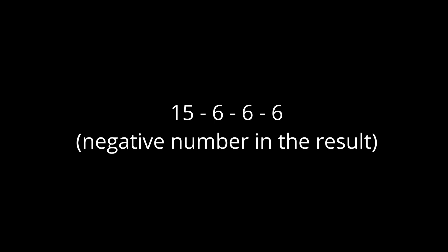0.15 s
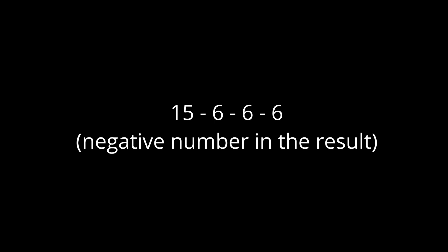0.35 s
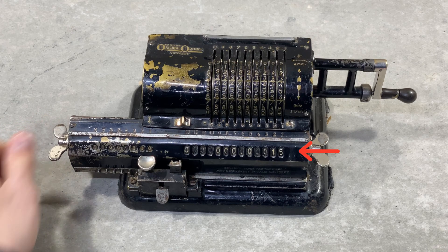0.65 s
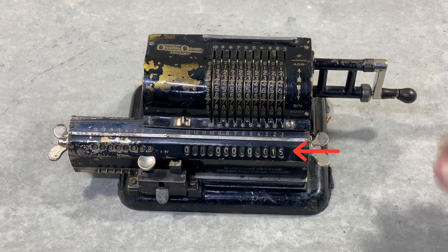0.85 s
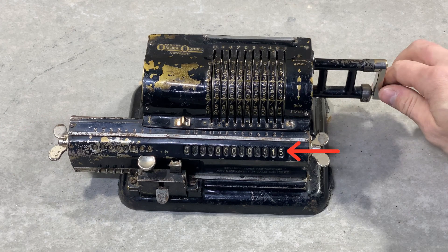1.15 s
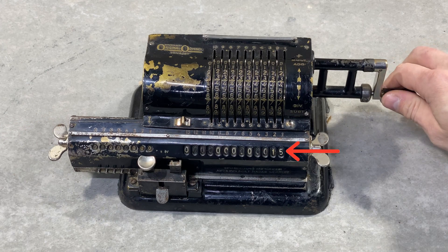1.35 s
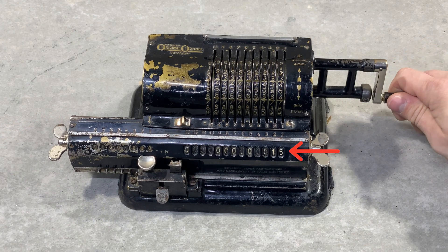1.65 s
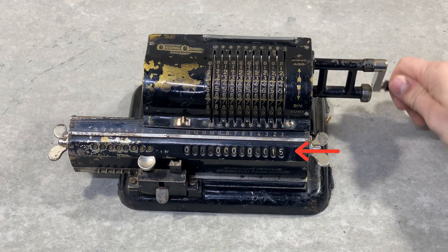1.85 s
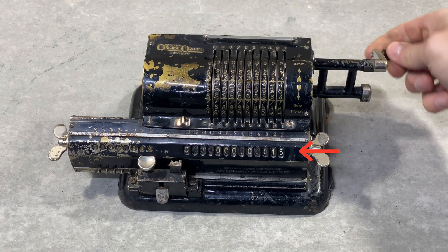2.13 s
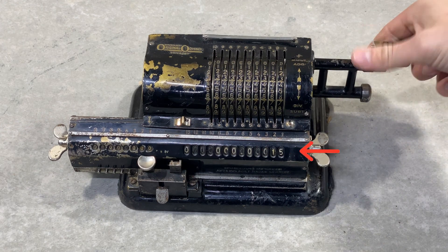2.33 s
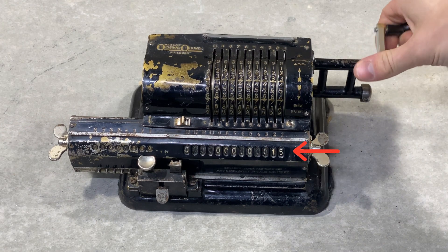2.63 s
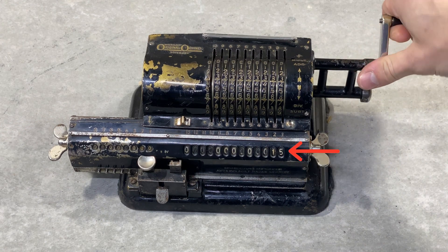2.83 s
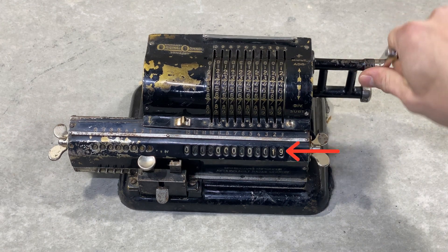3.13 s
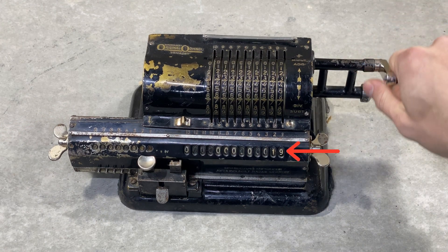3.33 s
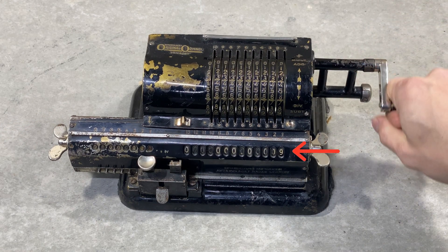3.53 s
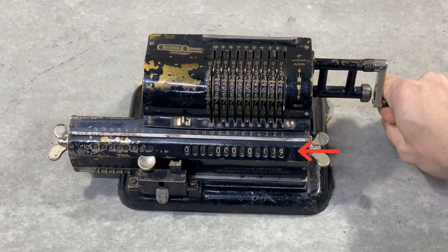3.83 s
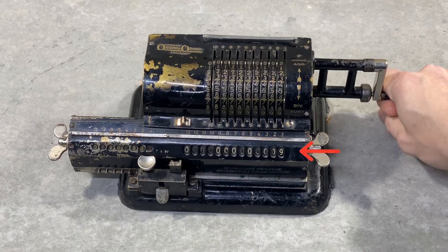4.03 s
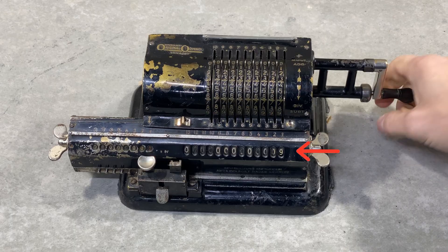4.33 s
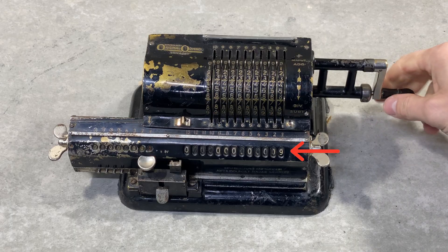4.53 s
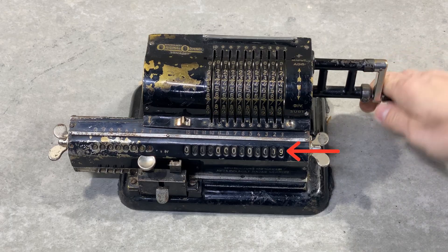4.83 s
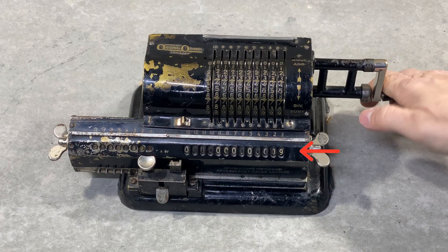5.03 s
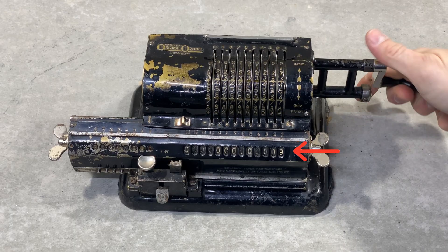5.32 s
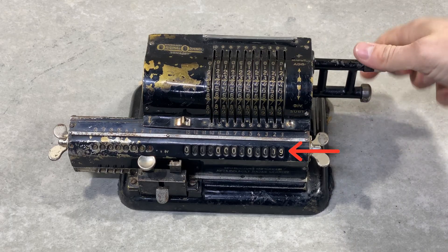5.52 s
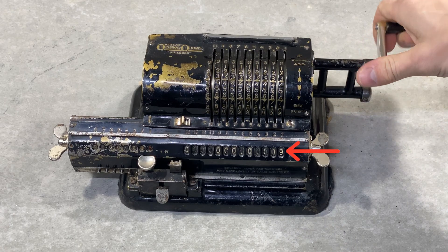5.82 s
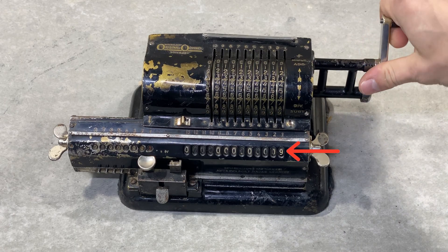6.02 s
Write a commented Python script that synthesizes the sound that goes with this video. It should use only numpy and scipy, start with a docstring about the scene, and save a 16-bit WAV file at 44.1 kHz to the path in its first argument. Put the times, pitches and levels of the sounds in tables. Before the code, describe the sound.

A hand-cranked mechanical calculator makes sparse faint ticks, then a loud burst of ratchet clicks and a frame thud, soft clicks, and two sharp closing snaps.

```python
"""Pawls and detents click inside a hand-cranked pinwheel calculator, close by and stronger on the left.
The clicks are short bursts of noise ringing in steel; the cast frame thuds as a sum of fading tones.
Coloured noise makes the rocking and shaking frame, the rumbling slab, the rubbing bearings and
a fine hiss that rises and falls. A bare room answers with fading noise tails, over a faint steady hush."""
import sys
import numpy as np
from scipy import signal
from scipy.fft import rfft, irfft, next_fast_len
from scipy.io import wavfile
from scipy.ndimage import map_coordinates

SR = 44100
rng = np.random.default_rng(int(sys.argv[2]) if len(sys.argv) > 2 else 0)


def generate_wav(sig):
    """Save sig (samples, or channels by samples) to the path in sys.argv[1] as 16-bit PCM at SR."""
    pcm = np.round(np.clip(np.atleast_2d(sig).T, -1, 1) * 32767).astype(np.int16)
    wavfile.write(sys.argv[1], SR, pcm)


N = 272097

# Tones of the cast frame. Each row: pitch in Hz, relative level in dB,
# time to fade by 60 dB in seconds when the damping is 1.
FRAME_MODES = [(74.4, -21, 0.34), (117.6, 1.5, .25), (166.5, -10.5, 0.51), (196, -15, 0.37),
               (274, -4, 0.21), (331, -11, 0.23), (364.5, -8.5, 0.15), (439.4, -9.5, 0.1),
               (493.4, -13.5, 0.16), (562, -15, 0.13), (667.4, -16, .13), (802, -24, 0.09),
               (1061.5, -30.5, 0.064)]


def amp(db):
    """Turn dB into a plain multiplier."""
    return 10 ** (np.asarray(db) / 20)


def unit(x):
    """Scale a sound to an rms of 1."""
    return x / np.sqrt(np.mean(x ** 2) + 1e-20)


def along(points, hz):
    """Read a curve of (Hz, value) points on a logarithmic pitch axis."""
    f, v = np.transpose(points)
    return np.interp(np.log(hz + 1), np.log(f + 1), v)


def curves(rows):
    """One value per sample for each column after the time."""
    s, *columns = np.transpose(rows)
    return [np.interp(np.arange(N) / SR, s, c) for c in columns]


def filtered(x, response):
    """Multiply the spectrum of x by a complex response of frequency."""
    n = x.shape[-1]
    m = next_fast_len(n + 8192)
    hz = np.fft.rfftfreq(m, 1 / SR)
    return irfft(rfft(x, m) * response(hz), m)[..., :n]


def modes(f, rows):
    """Response of several resonances, rows of (Hz, width Hz, dB), with alternating signs."""
    total = 0
    for k, (center, width, db) in enumerate(rows):
        resonance = 1j * f * width / (center * center - f * f + 1j * f * width)
        total = total + (-1) ** k * amp(db) * resonance
    return total


def wobble(rate):
    """A smooth random curve, with rate random points a second."""
    points = rng.standard_normal(int(N * rate / SR) + 4)
    return map_coordinates(points, [np.arange(N) * rate / SR])


def noise(spectrum):
    """Noise of rms 1, coloured by (Hz, relative dB) points."""
    return unit(filtered(rng.standard_normal(N), lambda hz: amp(along(spectrum, hz))))


def add(track, s, sound):
    """Mix a sound into the track from time s."""
    part = track[round(s * SR):][:len(sound)]
    part += sound[:len(part)]


def ratchet_teeth():
    """At each tooth the pawl slips, drops and rebounds: three contacts in a quick row."""
    # Ratchet teeth in a turn. Each row: time of the drop in seconds, its peak in dB,
    # extra strength of the slip in dB, of the rebound in dB.
    teeth = [(2.8909, -10.5, 0, -1.5), (2.9422, -12.5, 0, -5), (2.9886, -10.5, -5, -2.5),
             (3.031, -10, -7, -1.5), (3.0692, -10.5, 5.5, 3), (3.1206, -11, -4, -4),
             (3.408, -12.5, -0.5, -8.5), (6.09, -11.5, -6, -1.5), (6.146, -10, -3, -1)]
    # Rows for slip, drop and rebound: delay in seconds, level against the drop in dB, body in dB,
    # middle in dB, treble in dB, chatter in ms, room in dB.
    stages = [(-.012, -20.5, 8, 9, 8.5, 6, 8.5), (0, 0, -4.5, 0, -0.5, 8, -13),
              (.009, -14, 7, 0.5, 1.5, 3.5, -0.5)]
    contacts = []
    for s, db, slip_db, rebound_db in teeth:
        for extra_db, (delay, level_db, *rest) in zip((slip_db, 0, rebound_db), stages):
            contacts.append((s + delay, db + level_db + extra_db, *rest))
    return contacts


def other_contacts():
    """Contacts deep in the works lose treble, and the room's share of them grows."""
    # Each row: start in seconds, peak in dB, body in dB, middle in dB, treble in dB, chatter in ms.
    others = [(0.5514,-34,4.5,1.5,-14,1.3),(1.135,-62,26,14,2,4.5),(1.4737,-55.5,14,-1.5,-13,9),(1.5678,-49,17,1,-2,3.9),
              (1.654,-62,12,2,0,4.5),(1.7533,-43,10,8.5,-23,4),(1.9861,-48.5,9,-13,-22,8.5),(2.038,-51.5,0,-4,-19,4.6),
              (2.0512,-45.5,4,-1,-23,8.9),(2.085,-51,3,-5,-12,4.3),(2.118,-51.5,9,-5,-10,3.2),(2.1944,-54,10,-2,-18.5,15),
              (2.6584,-52,-6,1,-4,5.6),(2.724,-53,11,-3,-22,7),(2.75,-66,13,-2,-17,4.5),(2.7848,-46.5,11,-6,-18,15),
              (2.809,-42.5,15,3,-16,7),(2.85,-30.5,4,-3,-2.5,10),(2.8625,-36,1,11,-8,4.6),(3.076,-17,5,-17,-3,4.8),
              (3.085,-22,19.5,-8,-10,8.1),(3.1116,-18,-19,-7,-9,11),(3.235,-39.5,-11,10,2,7.4),(3.3243,-64,14,20,-2,4.5),
              (3.3594,-30,-1,-3,-7,6.3),(3.4264,-31,17,-22,-6,5),(3.434,-40,15,1,4,4),(3.4415,-26.5,-7,-11,-12,5.2),
              (3.4507,-28.5,13,-14,-10,3.3),(3.4571,-26,15,-8,-1,8.9),(3.472,-23,5.5,0,-9,8.4),(3.4765,-14,6.5,5,5.5,2.4),
              (3.5873,-46.5,12,-10,6.5,7.2),(3.6584,-53,-1.5,-10.5,-21,5),(3.6724,-55.5,7,0,-17,3.1),(3.7464,-54.5,10,-8,-19,4.5),
              (3.7665,-54,11.5,-5,3,6.2),(3.8095,-59,20,-1,-14,6),(3.8274,-64.5,6,-1.5,-3,4.5),(3.868,-49.5,16,10.5,10,4.8),
              (3.8946,-39,-3.5,5.5,-6,4.4),(3.9057,-53,28,2.5,-22,10),(3.9284,-46.5,15,-0.5,0,3.5),(3.99,-60.5,-1,7,-7.5,3.7),
              (4.053,-60,10,20.5,-4.5,4),(4.067,-48.5,16,1,-8,3.2),(4.073,-40,11,-4.5,-8.5,3.5),(4.08,-47.5,16.5,11,-29,3),(4.1652,-60,5.5,-0.5,-13,3.6),
              (4.2084,-44,13.5,2.5,-7.5,6.5),(4.459,-62.5,14.5,4,1.5,5.8),(4.5018,-63,14,8,-1.5,9.7),(4.777,-42,17,-14.5,-16.5,5.2),
              (4.798,-32.5,9,5.5,4,9.8),(4.8074,-38.5,18.5,4,8,4.5),(4.8398,-37,16.5,13.5,7,6.9),(4.852,-53.5,16,-9.5,-7.5,27),(4.992,-52.5,7,10,-27,3.2),
              (5.097,-52.5,4,-8,-33,8.8),(5.3906,-67,15,-8,-21,16),(5.428,-52,14.5,-18.5,-20,6),(5.444,-57,5.5,-22,-27.5,28),(5.519,-56.5,25.5,-13.5,-23.5,4.6),(5.5381,-45,26.5,-5.5,-15,18.5),
              (5.5827,-48.5,0.5,11.5,12,8.2),(5.8298,-56,11,7.5,-6,4.9),(5.9718,-47.5,5.5,-11.5,-20,10),(5.9976,-41.5,15,-1.5,-7,7.8),
              (6.0409,-27.5,3,-4,-7,6.5)]
    room_db = -10  # for a contact with treble at 0 dB
    dull_room_db = 0.1863  # more room for each dB of treble lost
    return [(*row, room_db - dull_room_db * row[4]) for row in others]


def clicks():
    """Contacts chatter briefly in the steel parts; a single blow of the same colour feeds the room."""
    # Resonances of the steel parts. Each row: pitch in Hz, width in Hz, relative level in dB.
    steel = [(1676, 130, -12.5), (2310, 130, -1), (2744, 190, -5), (4500, 500, -3.5), (5230, 760, -13),
             (6150, 830, -3.5), (7600, 730, -6), (10120, 1500, -3.5), (10980, 880, -13), (12850, 430, -8),
             (15100, 840, -13)]
    track, blows, t = np.zeros(N), np.zeros(N), np.arange(2048) / SR
    for s, db, body_db, mid_db, treble_db, ms, wet_db in ratchet_teeth() + other_contacts():
        life = t / (np.clip(ms, .5, 30) / 1000)
        # a sharp first strike, then the pawl settles
        fading = np.exp(-life ** 1.7) + 1.5 * np.exp(-t / 0.001)
        chatter = rng.standard_normal(len(t)) * fading * (1 - np.exp(-t / 0.00026))
        single_blow = t == t[20]
        # the balance of the resonances varies a little from contact to contact
        parts = [(hz, width, level + rng.normal(0, 1.5)) for hz, width, level in steel]
        # hard contacts are bright, soft ones dull
        tilt = [(700, body_db - 26.5), (1500, body_db), (2800, 0.007), (5000, mid_db), (9500, treble_db)]
        click, blow = filtered(np.array([chatter, single_blow]),
                               lambda f: (modes(f, parts) + amp(-12.5)) * amp(along(tilt, f)))
        click = amp(db) * click / np.max(np.abs(click))
        add(track, s, click)
        add(blows, s, amp(wet_db) * blow * np.linalg.norm(click) / np.linalg.norm(blow))
    return track, blows


def loose_parts():
    """Loose parts ring on as fading tones; a wandering phase makes them rough."""
    # Each row: start in seconds, pitch in Hz, starting level in dB, time to fade by 60 dB in seconds.
    rings = [(.554, 620, -68, .9), (1.57, 2450, -74, .3), (1.985, 5450, -73, .2), (4.03, 1700, -66, 1.1),
             (4.3, 1480, -78, .8)]
    track, t = np.zeros(N), np.arange(SR // 2) / SR
    for s, hz, db, t60 in rings:
        drift = .02 * np.cumsum(rng.standard_normal(len(t))) * hz / 1000
        tone = np.sin(2 * np.pi * hz * t + drift)
        add(track, s, amp(db - 60 * t / t60) * tone * (t < .3))  # cut at 0.3 s
    return track


def frame_knocks():
    """Each knock rings the tones of the cast frame, and the grip of the hand damps them."""
    # Each row: time in seconds (the sound begins 2 ms before it), peak in dB,
    # brightness in dB per octave, damping by the grip (more fades faster).
    thuds = [(.557,-56,14,0.41),(1.32,-61,-9,0.93),(1.575,-56,7,0.47),(1.656,-51.5,4.5,1.2),(1.921,-54.5,-19,3.7),
             (1.982,-43,13.5,2.2),(2.007,-37.5,-1,1.5),(2.057,-46,4.5,0.36),(2.193,-48,10,1),(2.68,-54,-3.5,0.66),
             (2.752,-41.5,4,0.38),(2.855,-36.5,15.5,1.8),(2.894,-33,8,0.45),(2.948,-31,6,1.3),(2.993,-35.5,10,0.42),
             (3.032,-35,6,1.4),(3.08,-17,14.5,2.2),(3.091,-17,4,1.15),(3.116,-21,5.5,1.62),(3.289,-41,-10,3.1),
             (3.367,-36.5,12.5,0.83),(3.433,-25,4.5,1.9),(3.444,-30.5,16,1.2),(3.474,-26,13.5,2.1),(3.559,-43.5,-12.5,1.3),
             (3.898,-46,2.5,0.63),(4.075,-42,14.5,0.65),(4.225,-41,2,1.34),(4.701,-53,8.5,0.63),(4.781,-39.5,14.5,1.06),
             (4.81,-35,5,1.3),(4.846,-34.5,6,1.5),(5.104,-60,7.5,1.6),(5.39,-49,-1,0.43),(5.434,-38.5,7,0.59),
             (5.541,-37,11,1.46),(5.771,-54,1,.7),(5.854,-40.5,0,0.69),(5.928,-40.5,4,1.44),(6.045,-38.5,16.5,0.88),
             (6.118,-32,3.5,0.57),(6.149,-32,13.5,0.45)]
    track, t = np.zeros(N), np.arange(SR // 2) / SR
    for s, db, bright_db, damping in thuds:
        ring = np.zeros(len(t))
        for hz, level, t60 in FRAME_MODES:
            # a positive brightness favours the upper tones
            start_db = level + rng.normal(0, 2) + bright_db * np.log2(hz / 200)
            fade_db = 60 * t * np.clip(damping, .4, 6) / t60
            tone = np.sin(2 * np.pi * (hz * t + 0.68 * rng.random()))
            ring += amp(start_db - fade_db) * tone
        ring *= 1 - np.exp(-t / 0.0012)
        add(track, s - .002, amp(db) * ring / np.max(np.abs(ring)))
    return track


def frame_shaking(rock_db, shake_db):
    """The turning hand rocks the frame on its feet and shakes its upper tones: noise in resonances."""
    # the fade time of a tone sets its width; here each is 1.8 times wider
    wide = [(hz, 1.8 * np.log(1000) / (np.pi * t60), level) for hz, level, t60 in FRAME_MODES]
    jolts = rng.standard_normal((2, N)) * amp(2.5 * wobble(45))  # uneven push
    rock = filtered(jolts[0], lambda f: modes(f, wide[1:4]) / (1 + (100 / (f + 1)) ** 8))
    # a weak broad band fills the gaps between the upper tones
    broad = lambda f: amp(-30.5) / (1 + (f / 850) ** 6) * f / (f + 200)
    shake = filtered(jolts[1], lambda f: modes(f, wide[4:]) + broad(f))
    return amp(rock_db) * unit(rock) + amp(shake_db) * unit(shake)


def bearing_rub(rub_db):
    """Rubbing bearings make coloured noise with quick and slow random unevenness."""
    # Each row: pitch in Hz, relative level in dB per Hz.
    rub_color = [(410, -32), (700, -15.5), (1210, -10), (1830, 1.5), (2610, -8.5), (3030, -9.5),
                 (3480, -17), (5000, -28), (6500, -47.5), (11000, -120)]
    rub = unit(noise(rub_color) * amp(3.5 * wobble(90) + 1.5 * wobble(12)))
    return amp(rub_db) * rub


def slab_rumble():
    """The slab under the machine rumbles as low noise that rises and falls."""
    # Each row: pitch in Hz, relative level in dB per Hz.
    slab_color = [(15, -51.5), (28, -24), (45, -1), (62, 1), (82, -9.5), (100, -25.5), (140, -36.5),
                  (250, -120)]
    # Each row: time in seconds, level in dB.
    rumble = [(0.56, -51.5), (0.82, -68.5), (0.86, -55), (1.01, -74.5), (1.57, -60.5), (2.76, -61.5),
              (2.93, -46), (3.08, -45), (3.14, -35.5), (3.32, -58.5), (3.5, -46.5), (3.76, -59),
              (4.36, -53), (4.48, -71.5), (4.86, -56), (5.11, -62), (5.17, -53), (5.28, -67.5), (5.53, -54),
              (5.76, -65.5), (6.06, -58), (6.17, -52)]
    (level_db,) = curves(rumble)
    return amp(level_db) * noise(slab_color)


def fine_hiss():
    """A fine hiss rises and falls: high coloured noise under a level curve."""
    # Each row: pitch in Hz, relative level in dB per Hz.
    hiss_color = [(1470, -32.5), (2500, -8), (3060, -11.5), (3720, -4.5), (6880, -6), (8480, -9.5),
                  (10900, -6), (15000, -32)]
    # Each row: time in seconds, level in dB.
    hiss_level = [(.6, -87), (.8, -82), (1.28, -84.5), (1.6, -95), (2.4, -90.5), (2.9, -75), (3.05, -51),
                  (3.25, -72.5), (3.7, -92.5), (5.6, -91), (6.1, -76)]
    (level_db,) = curves(hiss_level)
    return amp(level_db) * noise(hiss_color)


def hand():
    """Frame, bearings, slab and fine hiss while the hand works the crank."""
    # Each row: time in seconds, rocking in dB, frame shake in dB, bearing rub in dB.
    effort = [(0.56, -94, -130, -138), (0.6, -68, -127, -135), (0.71, -78.5, -81, -87),
              (1.09, -77.5, -77.5, -79), (1.64, -69.5, -70, -82.5), (1.85, -69, -68.5, -101),
              (2.09, -52, -59, -80), (2.23, -64.5, -78, -87.5), (2.43, -72, -83, -77.5),
              (2.62, -65.5, -62, -71), (2.86, -46.5, -52.5, -70.5), (3.0, -44, -43, -55),
              (3.08, -33, -50.5, -49), (3.18, -46.5, -60.5, -64), (3.7, -61.5, -64.5, -75.5),
              (4.09, -59.5, -65, -82.5), (4.2, -60, -65, -81), (4.33, -69.5, -80.5, -86.5),
              (4.62, -71, -82, -93.5), (4.87, -59, -78, -83.5), (5.12, -76, -84, -97),
              (5.42, -69.5, -84, -83), (5.56, -56, -72, -76.5), (5.87, -73, -61.5, -72.5),
              (6.03, -60, -49, -71), (6.17, -35, -43.5, -66)]
    rock_db, shake_db, rub_db = curves(effort)
    frame = frame_knocks() + frame_shaking(rock_db, shake_db)
    return frame + bearing_rub(rub_db) + slab_rumble() + fine_hiss()


def room(x):
    """Each frequency dies at its own speed; every stretch of sound gets a new noise tail."""
    # Each row: pitch in Hz, time to fade by 60 dB in seconds.
    fade_times = [(200, .35), (1500, 0.28), (5000, 0.29), (12000, 0.12)]
    wet, step = np.zeros((2, N)), SR // 16
    for k in range(0, N, step):
        hz, t, z = signal.stft(rng.standard_normal((2, SR // 3)), SR, nperseg=256)
        fading = amp(-60 * t / along(fade_times, hz)[:, None])
        tail = signal.istft(z * fading, SR, nperseg=256)[1]
        tail = tail / np.linalg.norm(tail[0])
        # the first tail is shared by both sides; the second sets them apart, mostly in the treble
        tail[1] = filtered(tail[1], lambda f: np.clip(f / 16000, 0, 1))
        for part, one in zip(wet, tail):
            add(part, (k + 120) / SR, signal.fftconvolve(x[k:k + step], one))
    return wet


def hush():
    """A faint steady coloured noise lies under everything."""
    # Each row: pitch in Hz, relative level in dB per Hz.
    hush_color = [(47, -32), (80, -4), (259, -17.5), (331, -7.5), (404, -14.5), (493, -9.5), (1120, -20),
                  (1560, -18), (2780, -36.5), (7530, -33.5), (8600, -49), (11000, -37.5), (16000, -51.5)]
    return amp(-79) * noise(hush_color)


def scene():
    """One close source left of the microphone, with its room and the hush."""
    # Each row: pitch in Hz, left minus right in dB.
    left_louder = [(100, 7.4), (7500, 7.3), (8800, 3.6), (14000, 2.6)]
    # Each row: pitch in Hz, phase in radians by which left leads.
    left_lead = [(100, 0), (7900, 0), (8600, -1.3), (11000, -.9), (13000, 1.2)]
    (works, blows), body = clicks(), hand()
    works = works + loose_parts()
    shared, apart = room(blows + amp(-8.5) * body)
    mid = works + body + shared + hush()
    both = np.array([1, -1])  # left, right

    def placing(f):
        loudness = amp(np.outer(both, along(left_louder, f) / 2) - 1.09)
        return loudness * np.exp(.5j * np.outer(both, along(left_lead, f)))

    sides = filtered(np.array([mid, mid]), placing)
    # the separate room tail and a trace of noise have opposite signs in the two sides
    return sides + np.outer(both, apart + amp(-104) * rng.standard_normal(N))


def record(dry):
    """Sound starts when the recorder opens, takes the microphone's colour and stops at a top frequency."""
    # Each row: pitch in Hz, level in dB.
    mic_color = [(25, -15), (50, -4), (80, 4.5), (8000, -2), (8600, -7), (9600, -1.5), (12800, -3),
                 (13600, -21.5), (14400, -15.5), (15500, -9.5), (16000, -23), (16600, -30)]
    start_s, top_hz = .5535, 16700
    t = np.arange(N) / SR
    opened = dry * np.clip((t - start_s) / 0.00043, 0, 1)
    color = lambda hz: amp(along(mic_color, hz)) * np.clip((top_hz - hz) / 400, 0, 1)
    # the filter may ring slightly ahead of the opening; only 4 ms of that is kept
    return filtered(opened, color) * (t > start_s - .004)


dry = scene()
out = record(dry)
generate_wav(out)
```